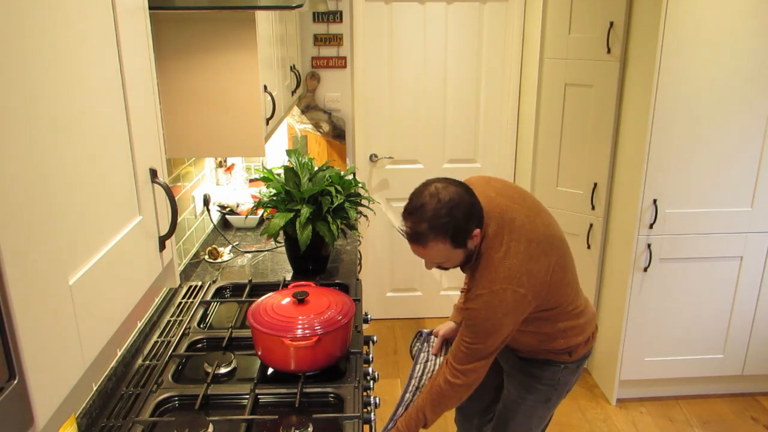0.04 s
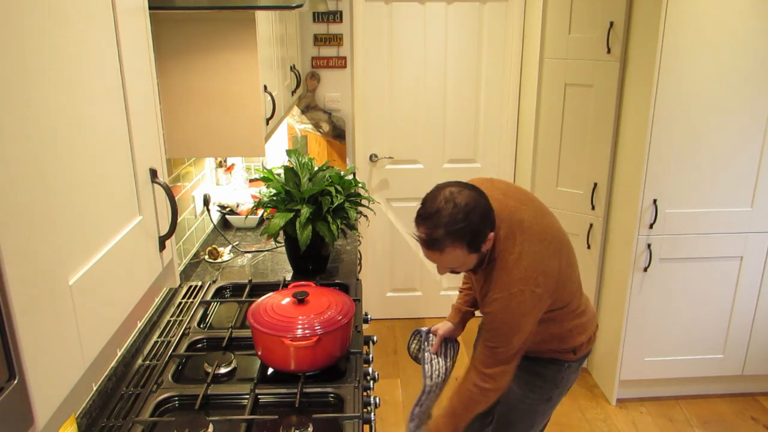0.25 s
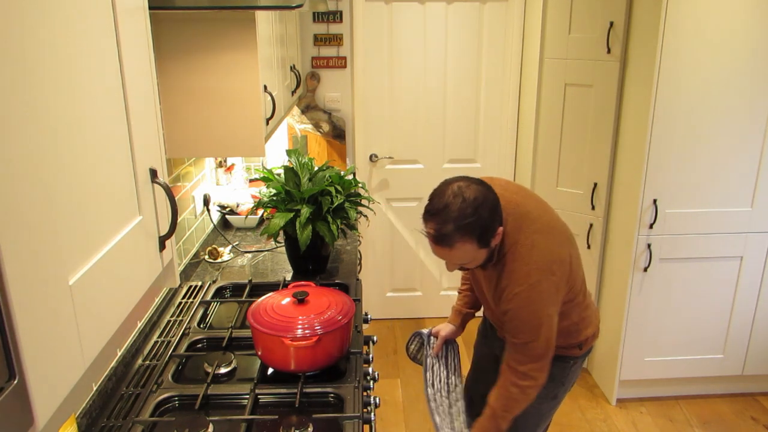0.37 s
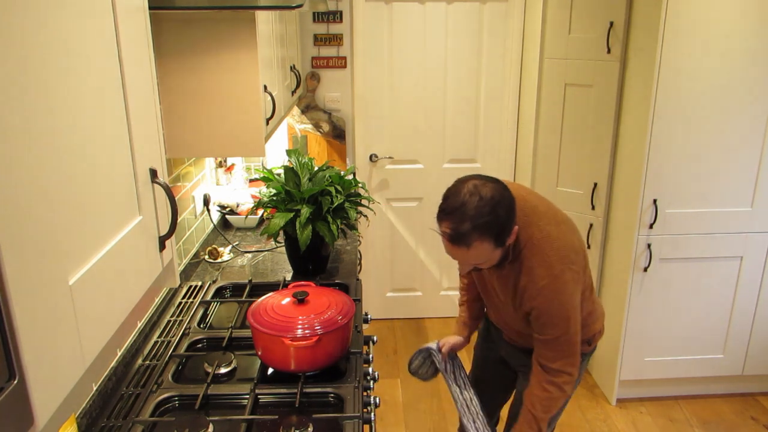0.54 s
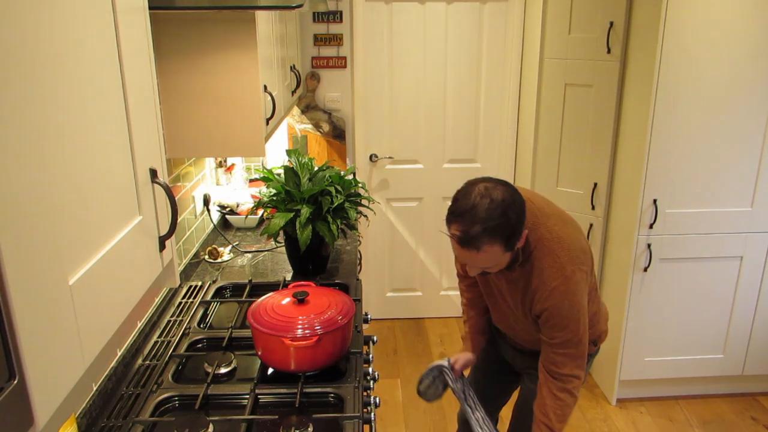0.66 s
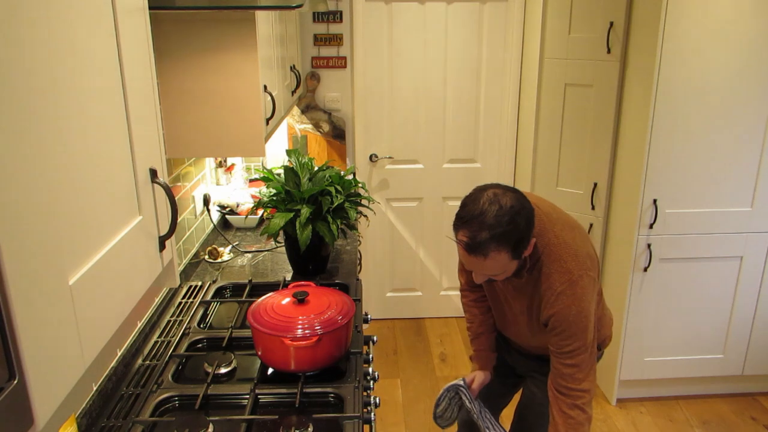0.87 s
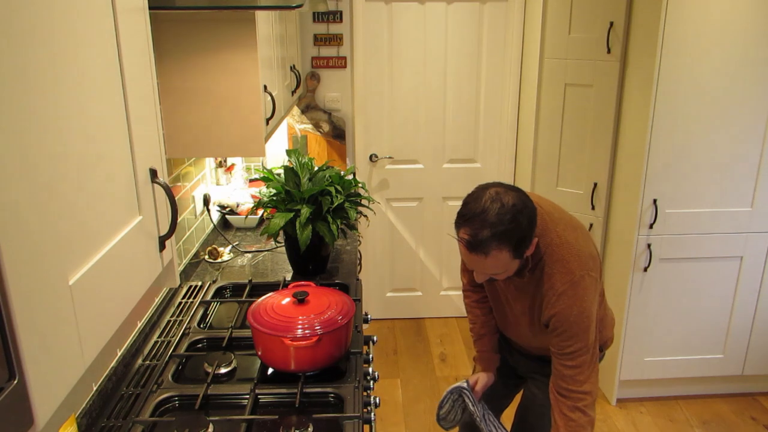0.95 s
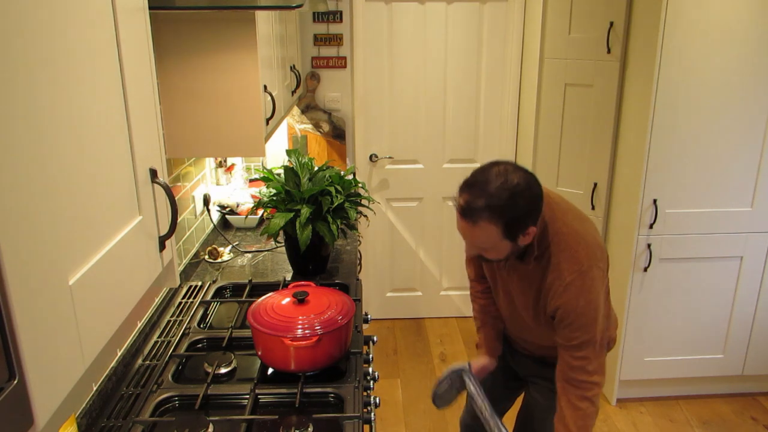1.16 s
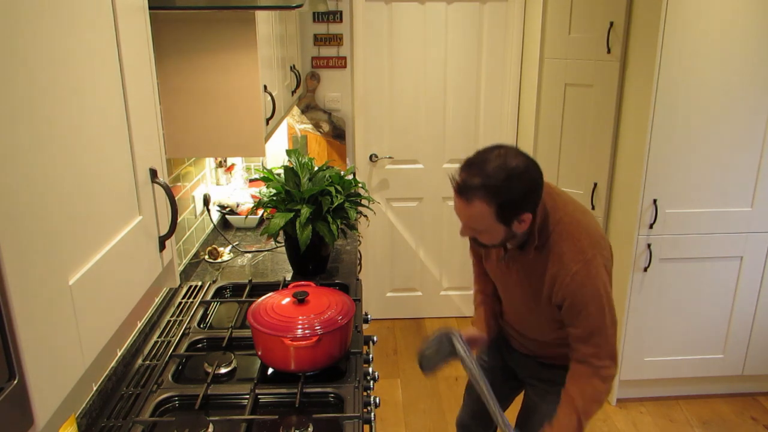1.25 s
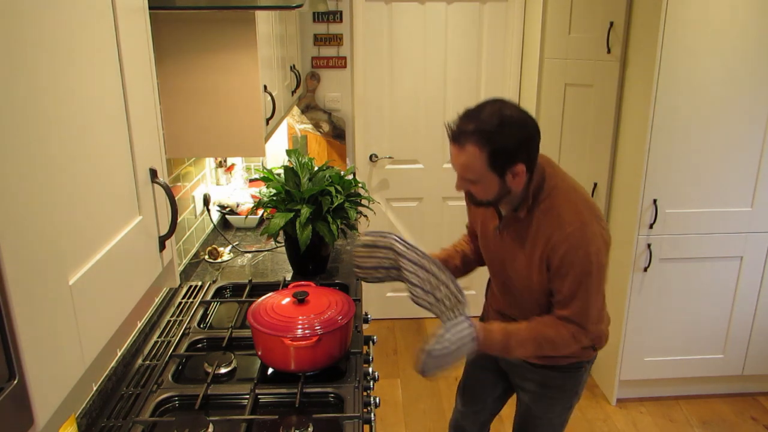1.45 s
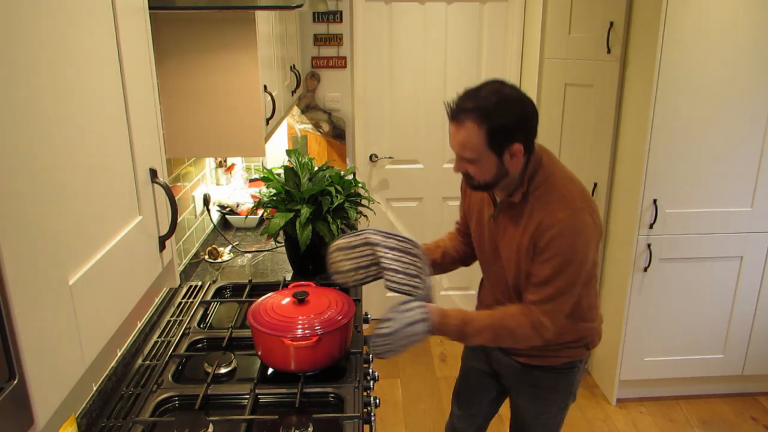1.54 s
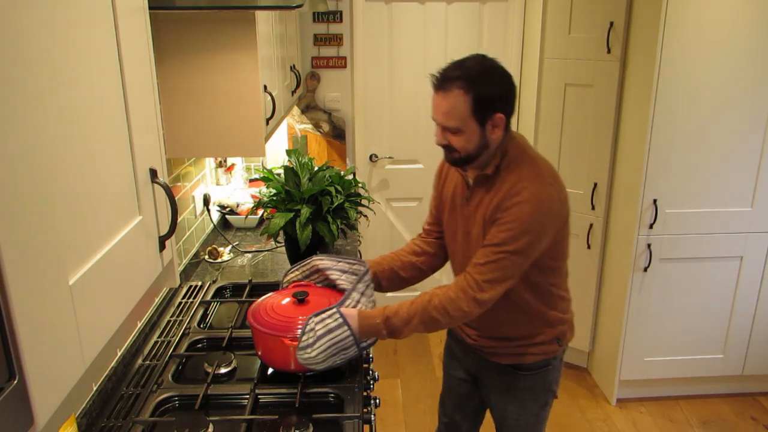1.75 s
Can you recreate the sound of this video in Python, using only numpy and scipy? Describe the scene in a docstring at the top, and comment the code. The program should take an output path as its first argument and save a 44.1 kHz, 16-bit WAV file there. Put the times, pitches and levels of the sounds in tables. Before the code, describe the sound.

In a quiet kitchen, an oven door bangs shut just after its hinge clacks. The steel panels ring briefly over a low boom, followed by a faint rustle of cloth and a soft footstep.

```python
"""An oven door swings shut in a small, quiet kitchen, over faint room noise and microphone hiss.
First the hinge clacks and its spring rings. Then the catch meets, the door slams and bounces.
The oven and room boom low while steel panels and shelves ring, dying away in about half a second.
Afterwards oven gloves rustle and a foot lands softly on the floorboards."""
import sys
import numpy as np
from scipy import signal
from scipy.fft import rfft, irfft
from scipy.io import wavfile

SR = 44100
rng = np.random.default_rng(int(sys.argv[2]) if len(sys.argv) > 2 else 0)


def dump_mix(stems):
    """Bounce the given channels to the path in sys.argv[1] as a 16-bit WAV at rate SR."""
    frames = np.atleast_2d(stems).T  # one column per channel
    limited = np.clip(frames, -1, 1)  # hard clip at full scale
    pcm = np.round(limited * 32767).astype(np.int16)
    wavfile.write(sys.argv[1], SR, pcm)


N = 79380
T = np.arange(N) / SR
FREQS = np.maximum(np.arange(N // 2 + 1) * SR / N, 1)
SIDES = np.array([[1], [-1]])  # left, right
# stereo width, how much the two ears differ: f/Hz, level/dB
WIDTH = [(60, -30), (150, -18.5), (450, -9.5), (1200, -10), (2500, -7.5), (5000, -6.5), (8000, -0.5),
         (13000, 2)]


def undb(db):
    """Turn decibels into a volume multiplier."""
    return 10 ** (np.asarray(db) / 20)


def along(points, hz):
    """Read between a table's rows, with octaves evenly spaced."""
    p = np.array(points)
    return np.interp(np.log(hz), np.log(p[:, 0]), p[:, 1])


def wander(position):
    """A random curve that heads for a new value at each whole number."""
    values = rng.standard_normal(1024)
    return np.interp(position, np.arange(len(values)), values)


def noise(colour, width, tilt_db=0):
    """Spectrum of stereo noise; more tilt (dB per octave) is brighter but no stronger."""
    gain = undb(along(colour, FREQS) + tilt_db * np.log2(FREQS / 2000))
    mid, side = rfft(rng.standard_normal((2, N)))
    stereo = mid + SIDES * side * undb(along(width, FREQS))
    return stereo * gain / np.sqrt(np.mean(gain ** 2))


def strike(start, rise_s, fade_s):
    """Loudness of a hit: it rises quickly, then falls 60 dB in each fade time."""
    age = np.maximum(T - start, 0)
    return (1 - np.exp(-age / rise_s)) * np.exp(-np.log(1000) * age / fade_s)


def knock(start, db, tilt_db, colour, rise_s, fade_scale=1, body=1):
    """A blow wakes so many tones that they blur into noise; each octave fades at its own rate."""
    # how long oven and kitchen ring together: f/Hz, fade/s
    fades = [(60, 1), (350, 0.37), (900, 0.6), (2000, 0.6), (5000, 0.54), (8000, 0.52), (13000, 0.42)]
    spectrum = body * noise(colour, WIDTH, tilt_db)
    octave = np.clip(np.log2(FREQS / 110), 0, 7)
    out = 0
    for k in range(8):
        band = irfft(spectrum * np.maximum(1 - abs(octave - k), 0), N)
        out += band * strike(start, rise_s, fade_scale * along(fades, 110 * 2 ** k))
    return undb(db) * out


def ring(tones, start, rise_s):
    """Clear tones of a struck object; the room makes each waver differently left and right."""
    out = 0
    for hz, db, fade_s in tones:
        mid = 1 + 0.2 * (wander(T * 26.7) + 1j * wander(T * 24.3))
        side = 0.27 * (wander(T * 23.1) + 1j * wander(T * 25.2))
        wave = np.exp(2j * np.pi * (hz * T + rng.random()))
        tone = ((mid + SIDES * side) * wave).real
        out += undb(db) * tone * strike(start, rise_s, fade_s)
    return out


def kitchen():
    """Faint, steady room noise and microphone hiss."""
    # tone colour of the background: f/Hz, level/dB
    colour = [(25, -8.5), (85, -1), (130, -11), (175, -3.5), (250, -7), (440, -9), (530, -4.5), (620, -8),
              (780, -6), (1000, -10.5), (1200, -13), (3600, -20), (4400, -20.5), (7400, -24), (8600, -26),
              (9250, -20.5), (9600, -27), (13500, -33), (15000, -44)]
    # its stereo width: f/Hz, level/dB
    width = [(50, 0.5), (200, 8), (700, 2), (3000, 0), (10000, -1.5)]
    return irfft(noise(colour, width), N) * undb(-57)


def hinge():
    """The metal hinge clacks lightly as the door swings up; its spring rings thinly."""
    # clacks: t/s, level/dB, tilt/dB per octave
    clacks = [(.006, -44.5, 5.5), (0.016, -45, -1.5), (0.034, -47.5, 3)]
    # tone colour of a clack: f/Hz, level/dB
    colour = [(100, -26), (400, 6.5), (850, 6), (1500, -0.5), (2200, 2.5), (3000, -1), (5400, -6),
              (7500, -13.5), (8500, -16), (13500, -24.5), (15000, -27)]
    # tones of the spring and door frame: f/Hz, level/dB, fade/s
    tones = [(128.7, -58.5, 1), (766, -53, 0.94), (2025, -59, .5), (2750, -69, .45), (3540, -56, 1),
             (3460, -47.5, 0.22), (5416, -51, 0.28), (6940, -55, 0.66), (13100, -52, 0.2)]
    # one metal body gives every clack the same peaks and dips, deeper in the treble
    depth_db, spacing_hz = 4 * np.minimum(FREQS / 9000, 1), 130
    frame = undb(depth_db * wander(FREQS / spacing_hz))
    out = sum(knock(*clack, colour, rise_s=0.0017, body=frame) for clack in clacks)
    return out + ring(tones, start=clacks[1][0], rise_s=0.0017)


def door():
    """The door meets the catch, slams and bounces: each blow is a short crack and a clang."""
    # blows: t/s, relative level/dB, tilt/dB per octave
    blows = [(0.1464, -5, 1), (0.153, -0.5, -0.5), (0.1538, 0, 0.5), (.166, -16.5, -3), (0.201, -12, -3),
             (.241, -11, -2.5)]
    # tone colour of the casing and shelves: f/Hz, level/dB
    clang = [(30, -15), (130, -15.5), (300, -11), (380, 0), (560, -2.5), (660, -3.5), (820, -0.5),
             (1250, -1.5), (1560, -1), (1750, 3), (2300, 3), (2600, -3), (3050, 0.5), (3600, -3.5),
             (4100, -10), (4800, -6.5), (5600, -9.5), (6700, -6), (8200, -13), (13700, -16.5), (15500, -44)]
    crack_db, clang_db, pan_db = -28, -24.5, -0.5
    out = 0
    for start, db, tilt_db in blows:
        bright_noise = irfft(noise(clang, WIDTH, tilt_db + 3), N)
        crack = bright_noise * strike(start, rise_s=0.00015, fade_s=0.13)
        out += undb(db + crack_db + SIDES * pan_db / 2) * crack
        out += knock(start, db + clang_db, tilt_db, clang, rise_s=0.00093)
    return out


def boom():
    """The air in the oven and room booms after the slam, louder on the oven's side."""
    # low tones: t/s, f/Hz, level/dB, rise/s, fade/s
    booms = [(.150, 45, -44, .008, .17), (.178, 81, -33.5, .04, .14), (.275, 80, -49, .015, .14),
             (.345, 80, -48, .018, .33)]
    out = 0
    for start, hz, db, rise_s, fade_s in booms:
        age = T - start
        swell = np.sqrt(np.clip(age / rise_s, 0, 1))
        fade = np.exp(-np.log(1000) * np.maximum(age - rise_s, 0) / fade_s)
        out += undb(db) * swell * fade * np.sin(2 * np.pi * hz * age)
    return out * undb(SIDES * 3)


def catch_and_panels():
    """The catch pings as it snaps home and the door's steel panels ring on."""
    # brief, bright tones of the catch: f/Hz, level/dB, fade/s
    catch_tones = [(1980, -26, .07), (2170, -25.5, .045), (2330, -26, .06), (6660, -38, .15)]
    # tones of the panels: f/Hz, relative level/dB, fade/s
    panel_tones = [(378, 5.5, .33), (426, 2.5, .44), (540, 3, .22), (571, -.5, .45), (925, -6, .45),
                   (1001, -4, .45), (1315, -8, .6), (1503, -1, .52), (1636, 0, .42), (1745, 4, .45),
                   (1882, 0, .42), (1917, 0, .52), (2034, -1, .5), (2098, -.5, .5), (2258, 0, .48),
                   (2375, 0, .48), (2455, -2, .45), (2703, -2, .5), (3004, -3, .48), (3052, -1, .5)]
    snap_s = 0.1505
    ping = ring(catch_tones, snap_s, rise_s=0.0008)
    return ping + undb(-31.5) * ring(panel_tones, snap_s, rise_s=0.009)


def gloves():
    """The cloth of gloves and sleeves slides in grainy swells."""
    # rustles: peak t/s, half-length/s, level/dB
    rustles = [(.725, 0.042, -68.5), (1.297, .13, -63.5), (1.737, 0.25, -65.5)]
    # tone colour of the cloth: f/Hz, level/dB
    colour = [(200, -10), (800, -1), (2200, 4), (5000, -3), (14000, -13)]
    grain_db, grain_hz = 2.5, 90
    swell = sum(undb(db) * np.exp(-((T - peak) / half) ** 2) for peak, half, db in rustles)
    return irfft(noise(colour, WIDTH), N) * swell * undb(grain_db * wander(T * grain_hz))


def steps():
    """A foot lands with dull thuds; the first sets the floorboards ringing."""
    # thuds: t/s, level/dB, tilt/dB per octave
    thuds = [(1.601, -48, -2), (1.612, -63.5, 4), (1.745, -59, 4.5)]
    # tone colour of a thud: f/Hz, level/dB
    colour = [(60, -12), (170, -20), (260, 5), (380, -10), (520, -10), (900, -6.5), (1500, -11),
              (2500, -22), (6000, -48)]
    # tones of the floorboards: f/Hz, level/dB, fade/s
    tones = [(247, -55, .3), (292, -57, .22), (372, -52, .18), (829, -61, .3)]
    out = sum(knock(*thud, colour, rise_s=0.0016, fade_scale=0.84) for thud in thuds)
    return out + ring(tones, start=thuds[0][0], rise_s=0.0016)


def scene():
    """All the sounds together at the microphone."""
    return kitchen() + hinge() + door() + boom() + catch_and_panels() + gloves() + steps()


def record(dry):
    """The camera cuts out two narrow bands of pitch and the highest treble."""
    notch_width_hz, top_hz = 260, 14500
    for hz in (3945, 7890):
        dry = signal.lfilter(*signal.iirnotch(hz, hz / notch_width_hz, fs=SR), dry)
    return signal.sosfilt(signal.ellip(8, .2, 80, top_hz, fs=SR, output="sos"), dry)


dry = scene()
out = record(dry)
dump_mix(out)
```